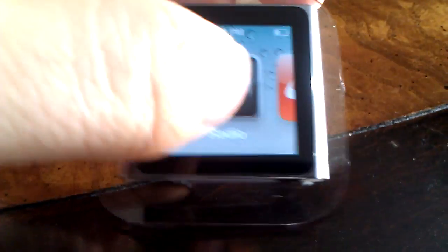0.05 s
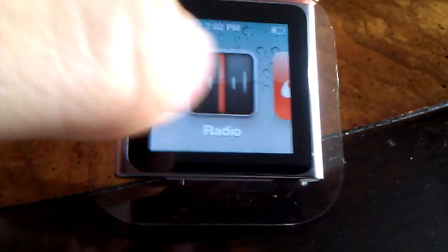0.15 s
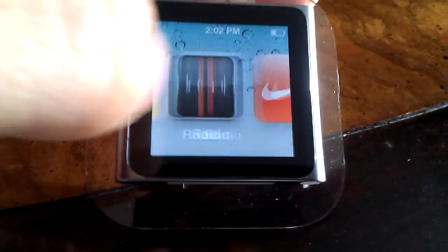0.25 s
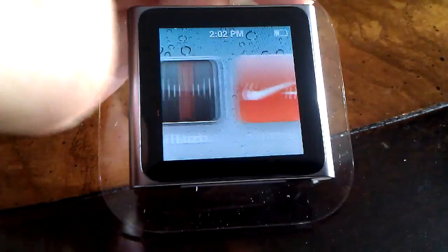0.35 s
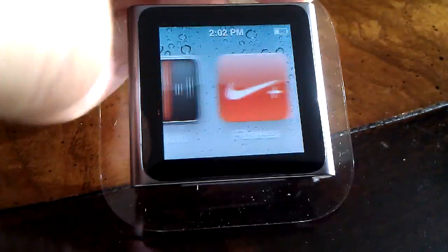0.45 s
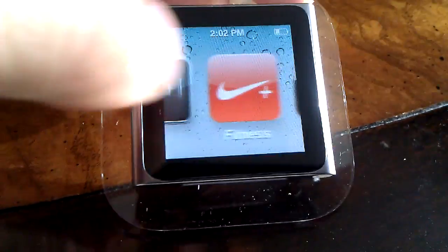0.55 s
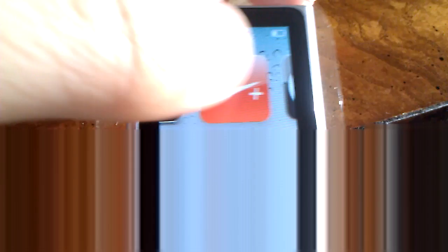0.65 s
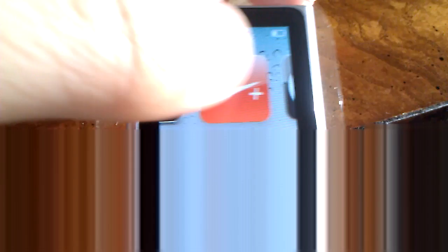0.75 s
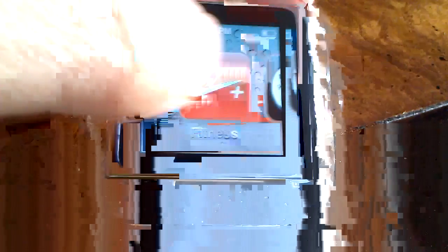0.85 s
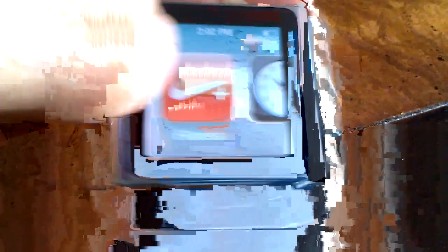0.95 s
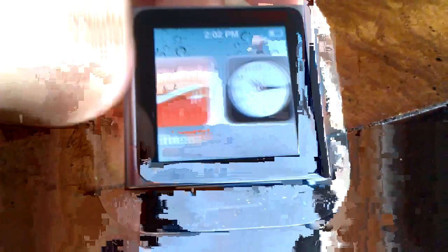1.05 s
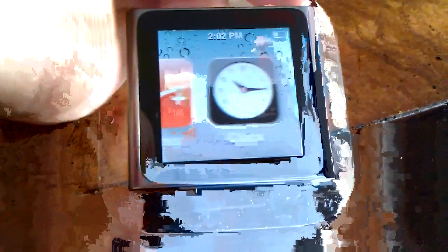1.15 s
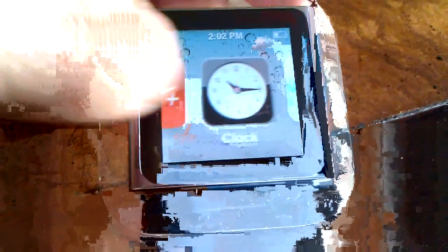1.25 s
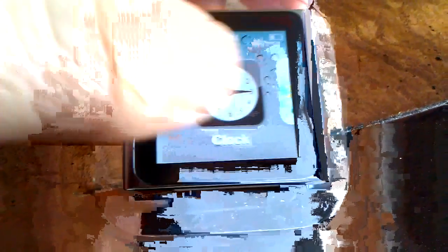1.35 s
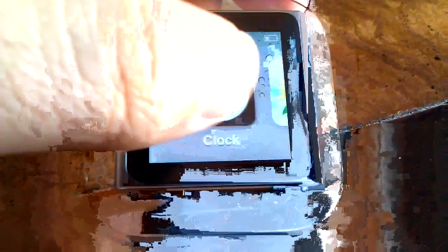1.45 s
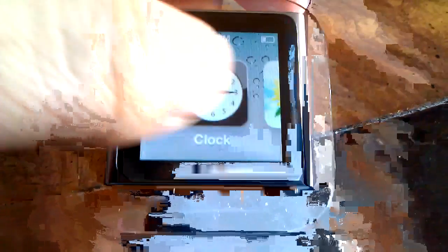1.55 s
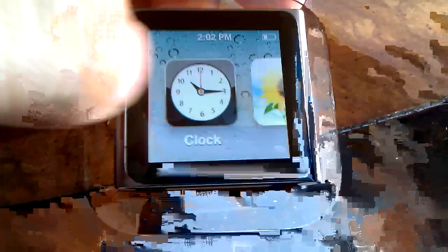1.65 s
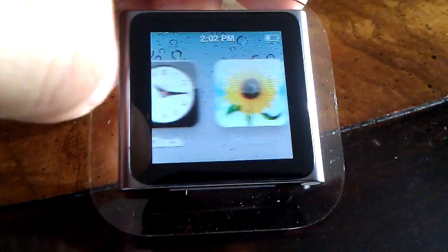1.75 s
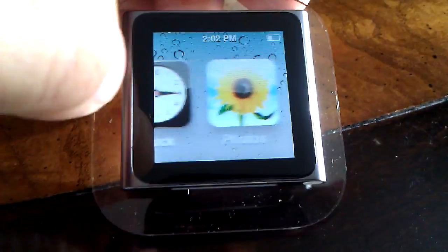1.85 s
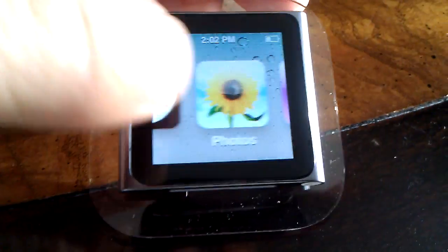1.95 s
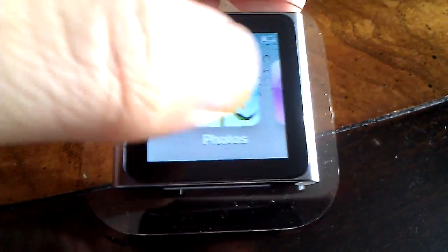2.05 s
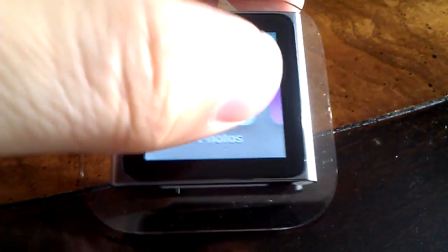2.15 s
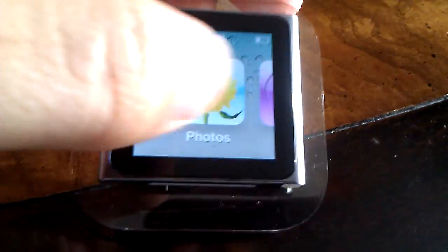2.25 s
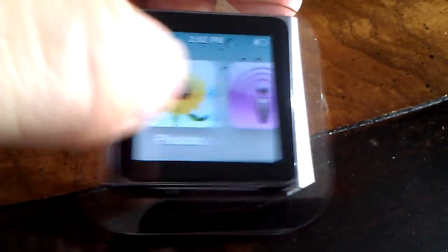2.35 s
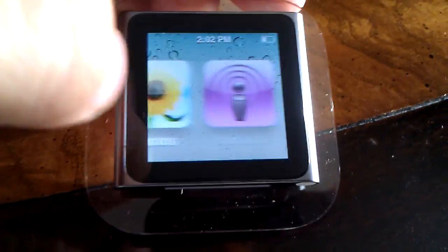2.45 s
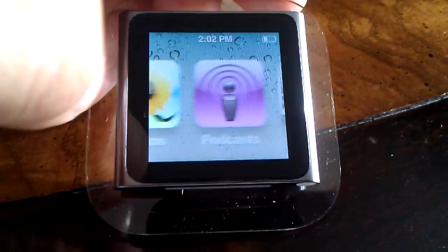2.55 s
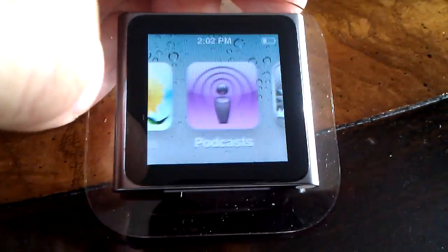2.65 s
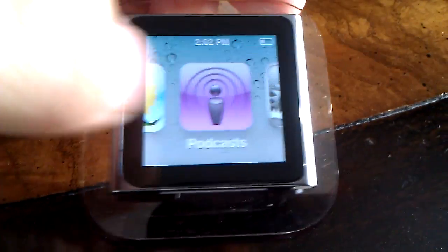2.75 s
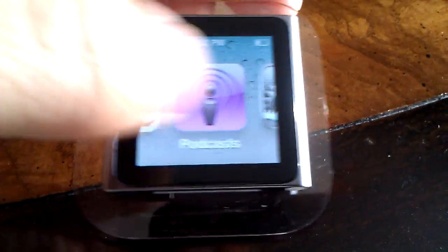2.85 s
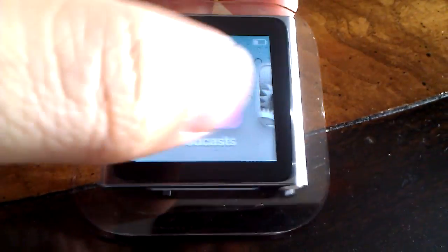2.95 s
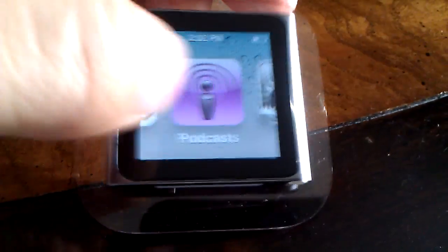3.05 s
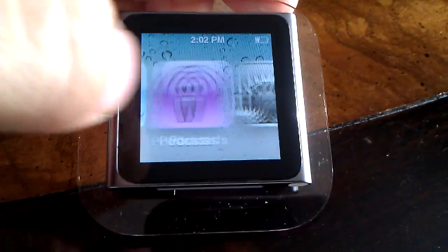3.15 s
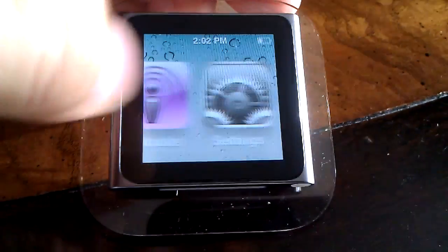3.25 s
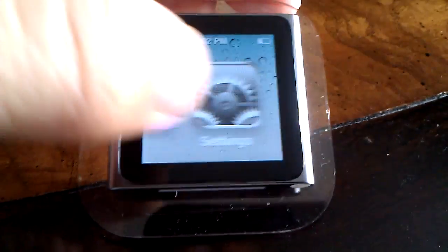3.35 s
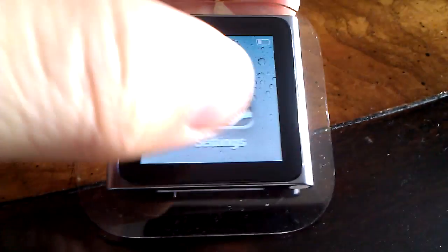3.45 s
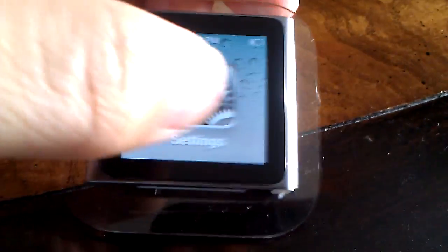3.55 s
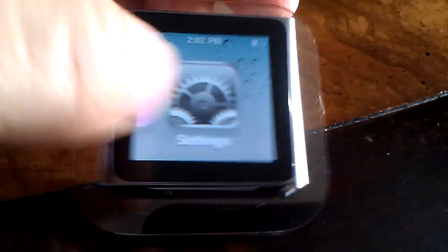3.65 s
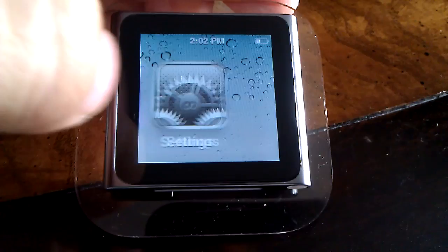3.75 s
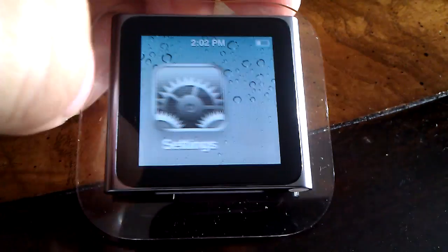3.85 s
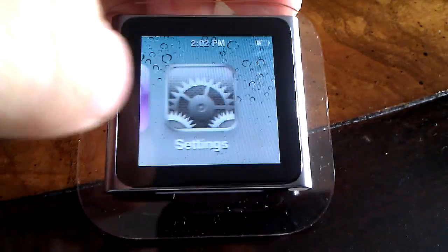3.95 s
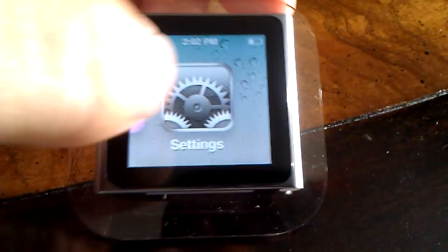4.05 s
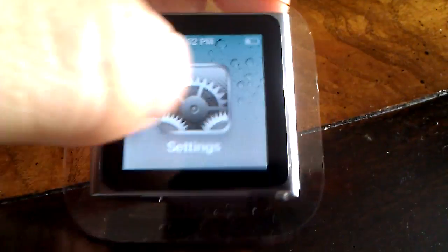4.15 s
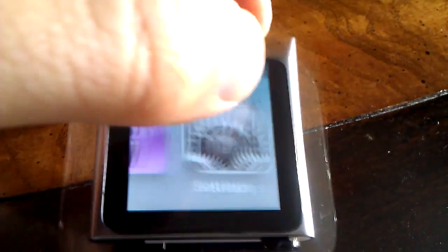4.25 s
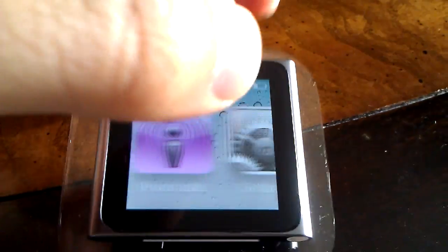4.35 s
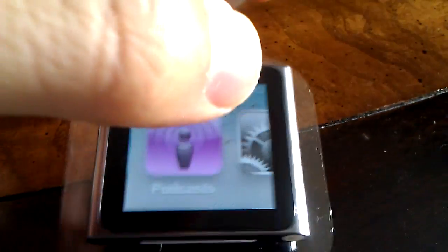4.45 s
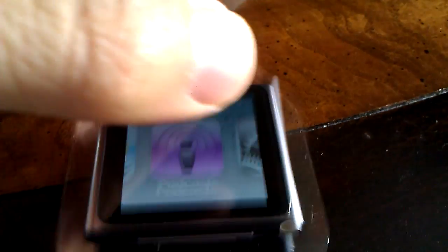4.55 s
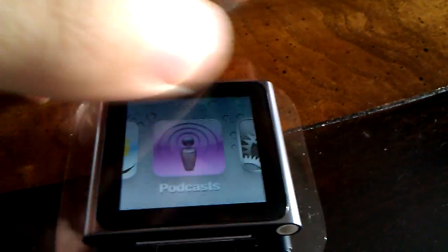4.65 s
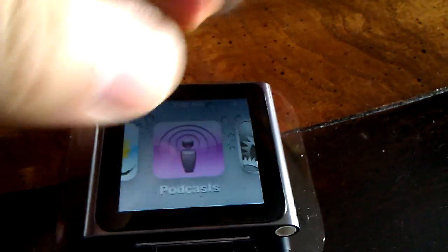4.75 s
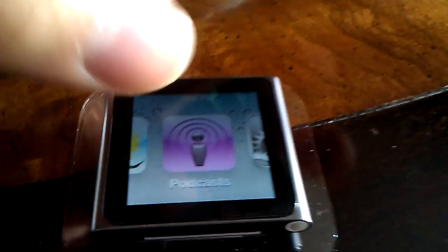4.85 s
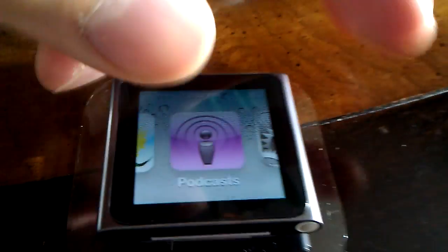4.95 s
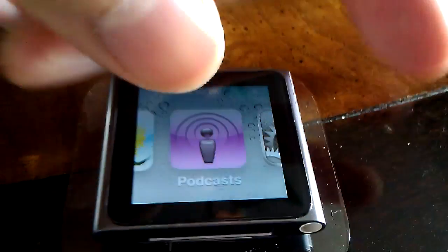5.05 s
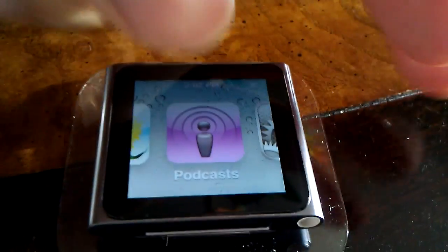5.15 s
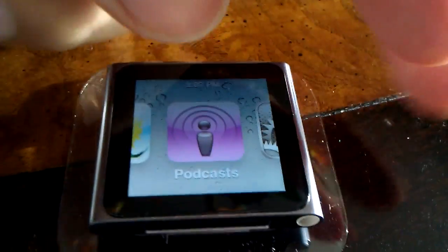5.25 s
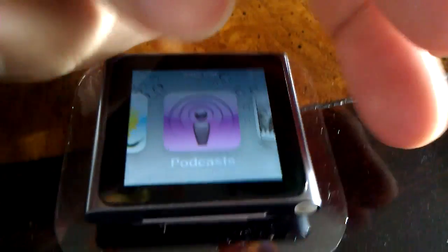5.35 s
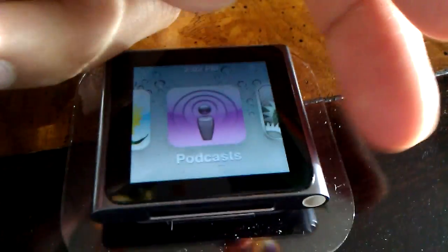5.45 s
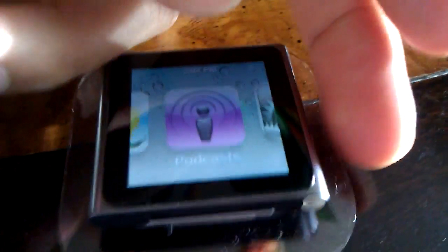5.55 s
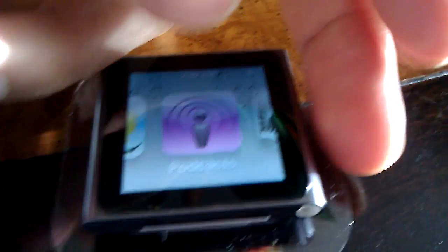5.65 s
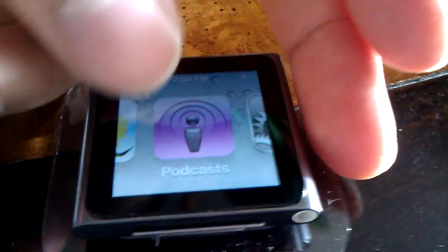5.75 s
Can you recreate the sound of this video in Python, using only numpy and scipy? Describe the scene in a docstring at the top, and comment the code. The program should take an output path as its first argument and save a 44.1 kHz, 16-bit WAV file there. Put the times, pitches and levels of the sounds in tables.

```python
"""A thumb rubs a tiny touchscreen player that sits on a clear plastic tray over a wooden table. From the start
soft skin friction, fine ticks and dry casing snaps alternate with presses that thump the tray and knock on wood.
Past four seconds the hand takes hold: the player clacks on the plastic, ringing its modes, and the tray scrapes
in dense little slips. Late presses, a long rub, a snap and two faint clacks with faint drags close the scene.
Filtered noise hisses faintly throughout, and the microphone's narrow band cuts the top off everything."""
import sys
import numpy as np
from scipy import signal
from scipy.fft import rfft, irfft
from scipy.io import wavfile

SR = 44100
rng = np.random.default_rng(int(sys.argv[2]) if len(sys.argv) > 2 else 0)


def bounce(signal):
    """Save signal as a 16-bit WAV file at the path given by the first command-line argument."""
    frames = np.transpose(np.atleast_2d(signal))
    limited = np.clip(frames, -1, 1)
    pcm = np.round(limited * 32767).astype(np.int16)
    wavfile.write(sys.argv[1], SR, pcm)


N = 256220   # scene length in samples
SNIP = np.arange(4096) / SR   # seconds within one contact


def from_db(db):
    """Decibels to amplitude."""
    return 10 ** (np.asarray(db) / 20)


def rms_one(x):
    """Scale to unit power."""
    return x / np.sqrt(np.mean(x ** 2) + 1e-20)


def passband(x, hz, kind, order=2):
    """Causal Butterworth filter."""
    return signal.sosfilt(signal.butter(order, hz, kind, fs=SR, output="sos"), x)


def colour(x, spectrum):
    """Minimum-phase filter that follows a spectrum, so nothing sounds early."""
    hz, db = np.transpose(spectrum)
    grid = np.maximum(np.fft.rfftfreq(len(SNIP), 1 / SR), 1)
    gain = from_db(np.interp(np.log(grid), np.log(hz), db))
    cepstrum = irfft(np.log(gain))
    # folding the cepstrum onto positive time makes the phase minimal
    cepstrum[1:] *= 2 * (np.arange(1, len(SNIP)) < len(SNIP) // 2)
    impulse_response = irfft(np.exp(rfft(cepstrum)))
    return signal.fftconvolve(x, impulse_response)[:len(x)]


def resonate(x, hz, width_hz):
    """One resonance with gain 1 on top."""
    r = np.exp(-np.pi * width_hz / SR)
    zeros = np.array([1, 0, -1]) * (1 - r * r) / 2
    poles = [1, -2 * r * np.cos(2 * np.pi * hz / SR), r * r]
    return signal.lfilter(zeros, poles, x + 1e-18)


def add(track, s, peak_db, sound):
    """Lay a short sound into a track at a given peak level."""
    at = round(s * SR)
    scaled = from_db(peak_db) * sound / np.abs(sound).max()
    track[at:at + len(sound)] += scaled[:N - at]


def contact(grit, grit_s):
    """A click followed by a brief chatter of the surfaces."""
    chatter = rng.standard_normal(len(SNIP)) * np.exp(-SNIP / grit_s)
    return (SNIP == 0) + grit * chatter


# the player clacks on the plastic; the last column is the ring of the spot struck:
# start_s [s], peak_db [dB], body_db [dB], treble_db [dB], spot_hz [Hz]
CLACK_HITS = [(4.4124, -30, 5, 3, 2850), (4.4631, -19.5, 3, 6.5, 2850), (4.708, -10.5, -4.5, -2.5, 2770),
              (4.7177, -10, -8, 1.5, 2850), (4.727, -20, -5, 13.5, 2700), (4.7566, -21.5, -15, -3, 2560),
              (4.764, -21.5, -2, 4, 2770), (4.798, -19.5, 4, 2, 2530), (4.8149, -8.5, 8.5, 0.5, 2200),
              (4.8331, -12, 7, 12, 2550), (4.8526, -22.5, 9, -8, 2350), (4.858, -23, 3.5, 2.5, 3000),
              (4.8647, -33, 13, 4, 2970), (4.873, -31, 22, 14.5, 2500), (5.775, -36, 16, 5, 2700),
              (5.786, -44, 21, 8.5, 2500)]
REBOUND_S, REBOUND_DB = .0036, -12   # each clack bounces once


def clacks(spot_db=2, spot_width_hz=700):
    """Casing against plastic: a hard, very short ring, with one note lifted by the spot struck."""
    out = np.zeros(N)
    for start_s, peak_db, body_db, treble_db, spot_hz in CLACK_HITS:
        for hit_s, hit_db in ((start_s, peak_db), (start_s + REBOUND_S, peak_db + REBOUND_DB)):
            force = contact(grit=0.065, grit_s=0.0024)
            force = force + from_db(spot_db) * resonate(force, spot_hz, spot_width_hz)
            add(out, hit_s, hit_db, tray(force, body_db, treble_db))
    return out


# resting modes of the plastic tray, varied by each hit: pitch_hz [Hz], width_hz [Hz], level_db [dB]
TRAY_MODES = [(486, 190, -20), (912, 127, -15), (1194, 130, -14), (1720, 150, -10), (2320, 356, -3.5),
              (2688, 239, 2), (3154, 140, -4.5), (3800, 840, -15), (4800, 206, -10), (5250, 280, -16),
              (6102, 460, -41), (7030, 230, -24.5), (8140, 208, -27.5)]


def tray(force, body_db, treble_db, spread_db=4.5, detune=0.018):
    """The tray's modes; the point of contact weights them and the grip shifts them a little."""
    out = 0
    variations = rng.standard_normal((len(TRAY_MODES), 2))
    for k, ((pitch_hz, width_hz, level_db), (weight, shift)) in enumerate(zip(TRAY_MODES, variations)):
        tilt_db = body_db * (pitch_hz < 1500) + treble_db * (pitch_hz > 3500)
        gain = from_db(level_db + tilt_db + spread_db * weight)
        ring = resonate(force, pitch_hz * (1 + detune * shift), width_hz)
        out = out + (-1) ** k * gain * ring   # neighbouring modes alternate in sign
    return out


# a press rocks the tray onto the table, thumping the tray and knocking its rim:
# start_s [s], thump_peak_db [dB], thump_pitch_hz [Hz], knock_peak_db [dB]
PRESSES = [(0.141, -39, 235, -52), (0.5505, -45, 206, -59), (0.6505, -36.5, 299, -40),
           (0.661, -41, 416, -37.5), (1.3114, -40.5, 392, -21), (1.3981, -41, 243, -48),
           (2.7371, -18, 302, -21.5), (2.754, -25, 309, -14), (4.18, -16.5, 368, -28.5),
           (4.195, -20, 297, -14.5), (5.064, -37, 400, -56), (5.0794, -23, 340, -29),
           (5.183, -47.5, 235, -60), (5.401, -32, 325, -36), (5.563, -40.5, 294, -46.5),
           (5.6633, -26.5, 382, -28.5)]
THUMP_SWELL_CYCLES = 0.35   # the rocking swells and dies on this scale, whatever its pitch


def thumps(low_hz=120):
    """Cushioned by the fingers, the tray rocks for three or four cycles; it is too small to radiate bass."""
    out = np.zeros(N)
    for start_s, peak_db, pitch_hz, _ in PRESSES:
        age = SNIP * pitch_hz / THUMP_SWELL_CYCLES
        swell = age ** 2 * np.exp(-age)
        rocking = swell * np.sin(2 * np.pi * pitch_hz * SNIP)
        add(out, start_s, peak_db, passband(rocking, low_hz, "high", order=3))
    return out


# the table top: pitch_hz [Hz], width_hz [Hz], level_db [dB]
WOOD_MODES = [(582, 240, 7.5), (1097, 190, 0.5), (1440, 220, -16), (1900, 580, -10.5)]
# a knock at KNOCK_DB has this low-pass corner; a harder one is brighter
KNOCK_HZ, KNOCK_DB, KNOCK_DB_PER_OCTAVE = 1255, -28.5, 21
GRAZE_S, GRAZE_DB = 0.00228, -18.5   # the rim grazes the wood just before it lands


def knocks(low_hz=200, top_hz=2900):
    """A blunt pulse, narrower for a harder contact, with a short ring of the wood."""
    out = np.zeros(N)
    for start_s, _, _, peak_db in PRESSES:
        for hit_s, hit_db in ((start_s - GRAZE_S, peak_db + GRAZE_DB), (start_s, peak_db)):
            bright_hz = KNOCK_HZ * 2 ** ((hit_db - KNOCK_DB) / KNOCK_DB_PER_OCTAVE)
            pulse = passband(contact(grit=0.00667, grit_s=0.00198), bright_hz, "low")
            pulse = passband(pulse, top_hz, "low", order=3)
            pulse = passband(pulse, low_hz, "high")
            ring = sum(from_db(level_db) * resonate(pulse, pitch_hz, width_hz)
                       for pitch_hz, width_hz, level_db in WOOD_MODES)
            add(out, hit_s, hit_db, pulse + ring)
    return out


# the casing shifts in its holder with a dry snap:
# start_s [s], peak_db [dB], lower_hz [Hz], upper_hz [Hz], upper_db [dB against the lower ring]
SNAP_HITS = [(0.5106, -24, 2257, 4180, 0.5), (4.247, -19.5, 2385, 4170, -1.5),
             (5.6299, -24.5, 2340, 3800, -4.5), (5.632, -26, 2470, 3080, -2.5)]
SETTLE_S, SETTLE_DB = 0.011, -18.5   # after a snap the casing settles


def snaps(lower_width_hz=420, upper_width_hz=650, case_hz=3200, case_width_hz=450, case_db=-3,
          low_hz=1700, top_hz=4900, crack_db=-22):
    """Gripped by the fingers, the casing rings very briefly under a faint bright crack."""
    out = np.zeros(N)
    for start_s, peak_db, lower_hz, upper_hz, upper_db in SNAP_HITS:
        force = contact(grit=0.029, grit_s=0.0022)
        ring = resonate(force, lower_hz, lower_width_hz)
        ring = ring + from_db(upper_db) * resonate(force, upper_hz, upper_width_hz)
        ring = ring - from_db(case_db) * resonate(force, case_hz, case_width_hz)
        ring = passband(passband(ring, top_hz, "low", order=10), low_hz, "high")
        snap = ring + from_db(crack_db) * colour(force, TICK_SPECTRUM)
        add(out, start_s, peak_db, snap)
        add(out, start_s + SETTLE_S, peak_db + SETTLE_DB, snap)
    return out


# the tray drags over the table, ever louder until it stops: stop_s [s], length_s [s], stop_level_db [dB]
TRAY_DRAGS = [(4.467, 0.14, -34), (4.805, 0.073, -37.5), (4.878, 0.044, -54.5), (5.675, 0.18, -59),
              (5.80, 0.21, -61.5)]
DRAG_SWELL_DB, DRAG_CURVE = 29.5, 1.14   # rise over a drag's length; it levels off towards the stop
DRAG_RELEASE_DB_PER_S = 903


def drag_gain(stop_s, length_s, stop_level_db):
    """Friction builds as the tray gathers speed and dies quickly once it stops."""
    t = np.arange(N) / SR - stop_s
    below_db = DRAG_SWELL_DB * np.maximum(-t / length_s, 0) ** DRAG_CURVE
    release_db = DRAG_RELEASE_DB_PER_S * np.maximum(t, 0)
    return from_db(stop_level_db - below_db - release_db)


# the tray's edge as it drags: pitch_hz [Hz], width_hz [Hz], level_db [dB]
EDGE_MODES = [(1190, 160, -20.5), (2090, 280, -6.5), (2550, 260, -1.5), (2850, 228, 2), (3980, 310, -9.5),
              (4420, 380, -5), (5120, 263, -9.5), (7050, 320, -20.5), (8130, 360, -17.5)]


def scrape(slips_per_s=5000, smooth_share=.3, catch_db=2.6, catch_hz=110):
    """Dense little slips ring the tray's edge, which catches and frees itself unevenly."""
    rub = rng.standard_normal(N)
    slips = rub * ((rng.random(N) < slips_per_s / SR) + smooth_share)   # slips over a smooth rub
    catching = rms_one(passband(rng.standard_normal(N), catch_hz, "low"))
    slips = slips * from_db(catch_db * catching)
    ringing = sum((-1) ** k * from_db(level_db) * resonate(slips, pitch_hz, width_hz)
                  for k, (pitch_hz, width_hz, level_db) in enumerate(EDGE_MODES))
    return sum(drag_gain(*drag) for drag in TRAY_DRAGS) * rms_one(ringing)


# small dry ticks of nail and casing: start_s [s], peak_db [dB]
TICK_HITS = [(1.1876, -36), (1.6653, -38), (2.6168, -28), (2.8809, -31.5), (3.5859, -39), (3.7506, -37),
             (4.22, -34), (4.298, -30.5), (5.129, -37.5), (5.4141, -35), (5.695, -38)]
# colour of a tick, and of the crack in a snap: frequency_hz [Hz], level_db [relative dB]
TICK_SPECTRUM = [(150, -6.5), (500, -2), (1300, -4), (2500, -4), (3900, 5.5), (5800, -7), (7600, 1.5),
                 (9000, -14.5)]


def ticks():
    """Tiny bright clicks, too light to set the tray ringing."""
    out = np.zeros(N)
    for start_s, peak_db in TICK_HITS:
        add(out, start_s, peak_db, colour(contact(grit=0.0165, grit_s=0.0014), TICK_SPECTRUM))
    return out


# the thumb slides on the glass: middle_s [s], half_length_s [s], level_db [dB]
THUMB_SWIPES = [(0.095, 0.0076, -61), (0.37, 0.037, -65), (0.527, 0.011, -63), (1.22, 0.02, -62.5),
                (1.76, 0.0094, -59), (2.422, 0.029, -63), (2.483, 0.012, -56.5), (2.602, 0.0056, -56),
                (3.288, 0.024, -58.5), (3.906, 0.032, -63.5), (5.112, 0.074, -61)]
# thumb friction on the glass: frequency_hz [Hz], level_db [relative dB]
GLASS_RUB_SPECTRUM = [(1200, -23.5), (2400, 0), (3400, -4), (4600, 0.5), (5600, -21), (8000, -33)]
# hand friction on the tray: frequency_hz [Hz], level_db [relative dB]
TRAY_RUB_SPECTRUM = [(150, -24), (480, 1), (1300, -2.5), (2300, -11), (3500, -17.5), (6000, -35)]
# the hand brushes the tray once as it shifts its grip
BRUSH_START_S, BRUSH_END_S, BRUSH_DB = 4.632, 4.70, -51.5
BRUSH_ATTACK_DB_PER_S, BRUSH_RELEASE_DB_PER_S = 1802, 452


def skin():
    """Soft friction noise of the thumb on the glass and of the hand on the tray."""
    t = np.arange(N) / SR
    strokes = sum(from_db(level_db) * np.exp(-np.minimum(((t - middle_s) / half_length_s) ** 2, 20))
                  for middle_s, half_length_s, level_db in THUMB_SWIPES)
    attack_db = BRUSH_ATTACK_DB_PER_S * np.maximum(BRUSH_START_S - t, 0)
    release_db = BRUSH_RELEASE_DB_PER_S * np.maximum(t - BRUSH_END_S, 0)
    brush = from_db(BRUSH_DB - attack_db - release_db)
    on_glass, on_tray = rng.standard_normal((2, N))
    thumb = strokes * rms_one(colour(on_glass, GLASS_RUB_SPECTRUM))
    hand = brush * rms_one(colour(on_tray, TRAY_RUB_SPECTRUM))
    return thumb + hand


def room(x, t60, wet_db, first_s=0.0034):
    """Weak scattered echoes from the table top and things close by."""
    echoes = rng.standard_normal(len(SNIP)) * from_db(-60 * SNIP / t60) * (SNIP > first_s)
    wet = signal.fftconvolve(x, echoes / np.linalg.norm(echoes))[:N]
    return x + from_db(wet_db) * wet


# microphone hiss and room air: frequency_hz [Hz], level_db [relative dB]
HISS_SPECTRUM = [(18, -80), (30, -29.5), (60, -13), (174, -5), (243, -1), (410, 0), (629, -1), (675, -2.5),
                 (725, -2), (857, -3), (1830, -9), (4210, -10.5), (5740, -25.5), (7810, -11.5),
                 (8800, -28.5), (11400, -59.5), (19400, -120)]
HISS_DB = -61   # rms level


def hiss(sizzle_hz=7850, sizzle_width_hz=120, sizzle_db=-84):
    """Steady microphone hiss and room air, with a faint narrow sizzle near the top."""
    air, sizzle = rng.standard_normal((2, N))
    air = from_db(HISS_DB) * rms_one(colour(air, HISS_SPECTRUM))
    return air + from_db(sizzle_db) * rms_one(resonate(sizzle, sizzle_hz, sizzle_width_hz))


def scene():
    """Dull and bright contacts, friction and hiss, in one channel."""
    damped = room(thumps() + knocks() + snaps(), t60=0.044, wet_db=-18.5)
    bright = room(clacks() + ticks() + scrape(), t60=0.067, wet_db=-18)
    return (damped + bright + skin() + hiss())[None]


CUTOFF_HZ = 8800


def record(dry):
    """The microphone's narrow band: a steep elliptic low-pass, 0.3 dB ripple and 55 dB rejection."""
    return signal.sosfilt(signal.ellip(8, .3, 55, CUTOFF_HZ, fs=SR, output="sos"), dry)


dry = scene()
out = record(dry)
bounce(out)
```